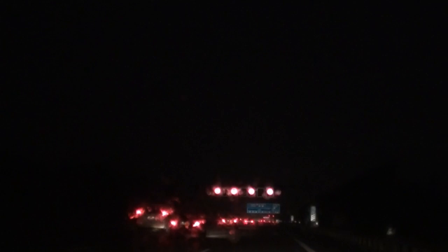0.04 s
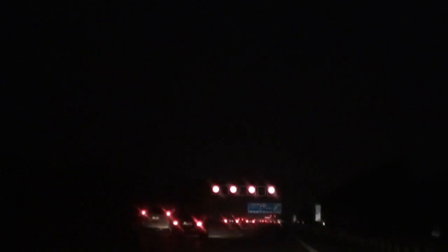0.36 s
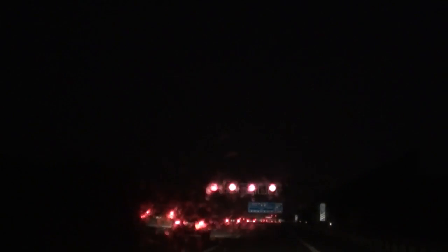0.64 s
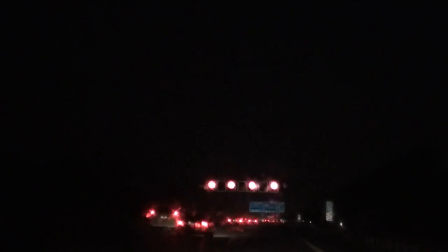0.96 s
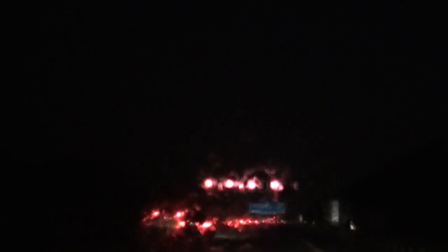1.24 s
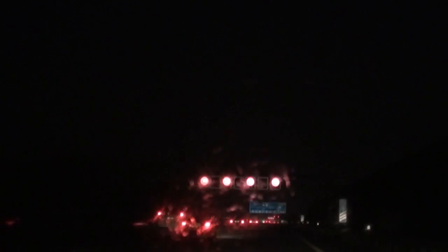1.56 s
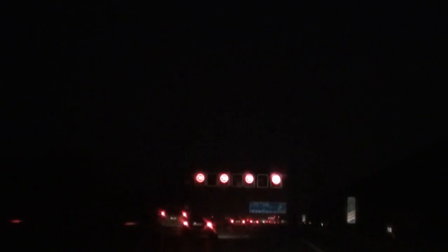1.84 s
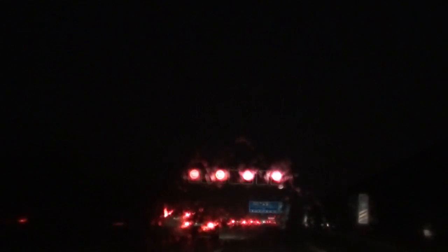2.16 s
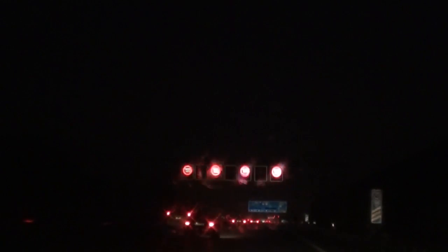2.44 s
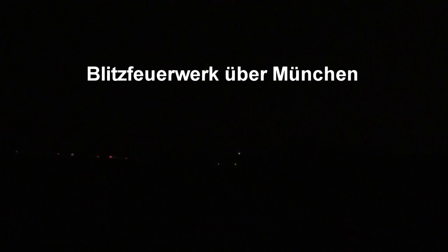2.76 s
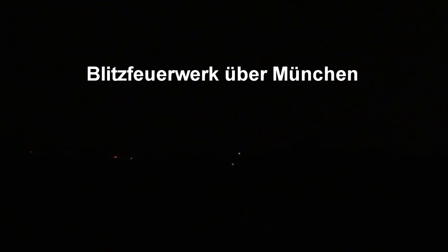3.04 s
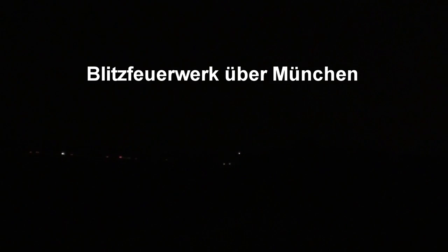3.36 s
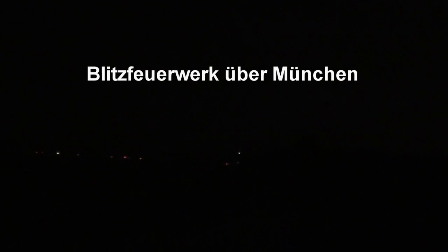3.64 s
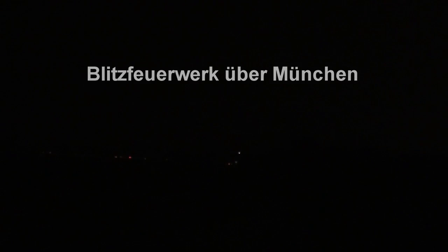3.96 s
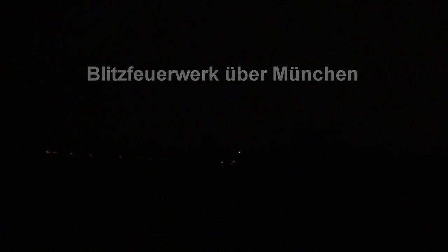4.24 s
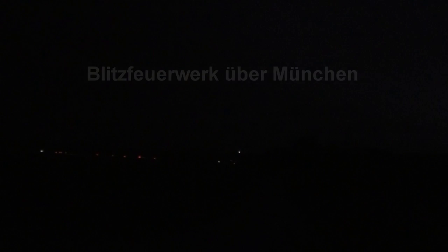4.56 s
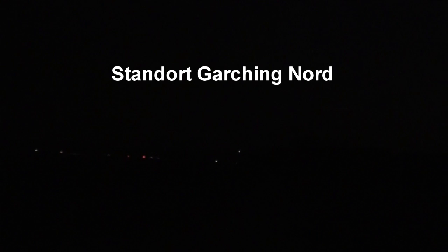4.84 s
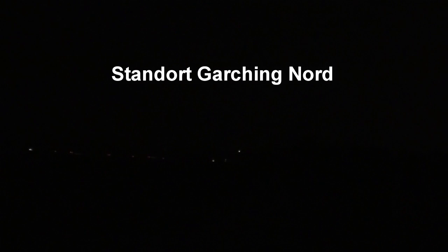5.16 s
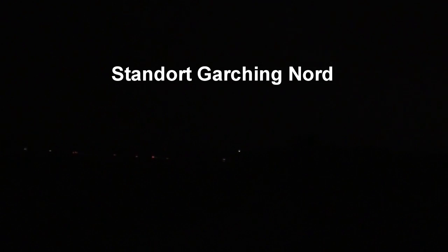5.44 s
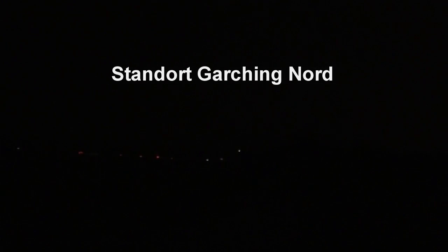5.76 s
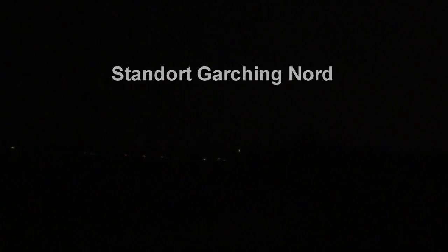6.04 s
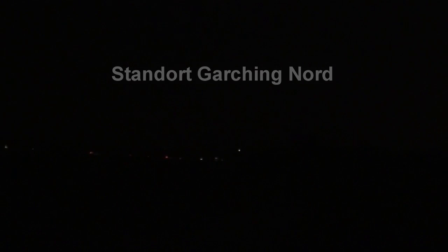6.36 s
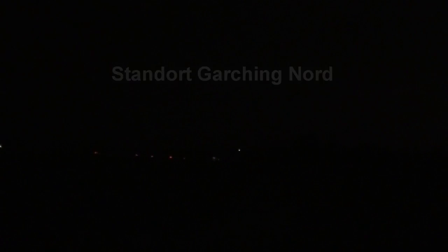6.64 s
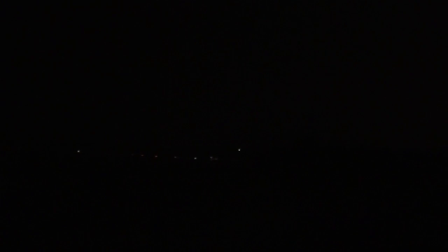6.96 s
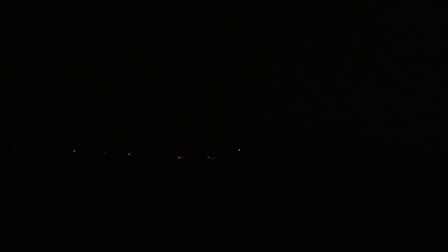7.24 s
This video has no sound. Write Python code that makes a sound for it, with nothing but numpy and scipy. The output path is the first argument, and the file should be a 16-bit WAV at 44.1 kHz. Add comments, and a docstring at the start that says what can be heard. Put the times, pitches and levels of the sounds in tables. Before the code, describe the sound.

A car booms along a wet road, then suddenly gives way to quiet, with a handled camera's clicks, knocks and small whirring motor.

```python
"""Inside a car on a wet motorway at night: the cabin booms, tyres roar and spray patters on the windscreen.
At 2.8 s an abrupt cut leads to the low hum of the standing car, where a hand works a camera.
Its small lens motor creeps, then buttons click, knocks ring the casing and the motor whirs three times.
Faint cricket-like chirps come in around the last whir.
Finally the motor creeps again while palm and fingertip bump and rub the casing."""
import sys
import numpy as np
from scipy import signal
from scipy.fft import rfft, irfft
from scipy.io import wavfile

SR = 44100
rng = np.random.default_rng(int(sys.argv[2]) if len(sys.argv) > 2 else 0)


def store_wav(level_fs):
    """Save 16-bit WAV to argv[1]."""
    pcm = np.round(np.clip(np.atleast_2d(level_fs), -1, 1) * 32767)
    wavfile.write(sys.argv[1], SR, pcm.T.astype(np.int16))


N = 331191
T = np.arange(N) / SR
CUT_S = 2.838

# Cabin boom and tyre roar spectra. Each row: frequency in Hz, density in dB.
BOOM_SPECTRUM = [(20, -30), (30, -19), (38, -11.5), (65, -14), (103, -6), (122, -1.5), (134, 3.5),
                 (147, -4), (162, -12), (178, 0.5), (200, -9), (280, -10.5), (400, -19.5), (700, -53)]
ROAR_SPECTRUM = [(150, -20), (310, 2.5), (410, -4.5), (500, -2), (600, -6.5), (750, -4), (880, -8.5),
                 (1020, -7.5), (1400, -12.5), (2000, -20.5), (3000, -16), (8000, -45)]
# Tread tones. Each row: frequency in Hz, width in Hz, level in dB against the roar.
TREAD_TONES = [(1014, 44, -20), (1725, 15, -23)]
# Rough road. Each row: middle in seconds, length in seconds, extra boom in dB, extra roar in dB.
ROUGH_STRETCHES = [(0.432, 0.3, 2.5, 1), (0.713, 0.14, 5.5, 2), (1.077, 0.39, 2.5, 0), (1.58, 0.36, 1.5, 3),
                   (1.842, 0.28, 1, 3), (2.41, 0.57, 2, 0), (2.76, 0.46, 0.5, 2)]
# Wetter road. Each row: middle in seconds, length in seconds, extra spray in dB.
WET_STRETCHES = [(.14, 0.96, 1.5), (1.286, 0.5, 3), (1.77, 0.55, 1.7)]
# Road balance. Each row: frequency in Hz, left minus right in dB.
ROAD_BALANCE = [(60, 2.2), (150, 2), (380, -0.5), (950, -2), (2380, 0)]
# Road stereo width. Each row: frequency in Hz, side against mid in dB.
ROAD_STEREO_WIDTH = [(30, -17), (60, -13), (100, -12.5), (150, -15), (250, -9.5), (700, -9), (1400, -8.5),
                     (3000, -8.5), (6000, -7), (9000, -9.5), (12000, -52)]

def driving(boom_db=-17, roar_db=-22.5, spray_db=-22, bump_db=0.27, bump_hz=7):
    """Rough road swells the boom and the roar, wet road the spray; the tread sings faintly."""
    boom_db += sum(db * arch(s, length) for s, length, db, _ in ROUGH_STRETCHES)
    roar_db += sum(db * arch(s, length) for s, length, _, db in ROUGH_STRETCHES)
    spray_db += sum(db * arch(s, length) for s, length, db in WET_STRETCHES)
    cabin = amp(boom_db + bump_db * wander(bump_hz)) * noise(BOOM_SPECTRUM, width=ROAD_STEREO_WIDTH)
    tread = sum(amp(db) * unit(wander(width_hz) * np.cos(2 * np.pi * hz * T + wander(width_hz)))
                for hz, width_hz, db in TREAD_TONES)
    tyres = amp(roar_db) * (noise(ROAR_SPECTRUM, width=ROAD_STEREO_WIDTH) + tread)
    return pan_bands(cabin + tyres + amp(spray_db) * spray(), ROAD_BALANCE)


# Spray spectrum before tilting. Each row: frequency in Hz, density in dB.
SPRAY_SPECTRUM = [(1060, -34), (1800, -6.5), (2430, -6), (3320, 1.5), (6070, -3.5), (7220, -2.5),
                  (8210, -5), (11700, -19.5), (13300, -24), (15100, -31), (16000, -29)]

def spray(drops_per_s=1900, spread_db=3.5, tilt_db_per_oct=2, wash_db=-0.5, gust_db=1, gust_hz=22):
    """Fine drops tick on the glass in gusts, over the hiss of tyres on the wet road."""
    sizes = amp(spread_db * np.minimum(rng.exponential(1, N), 5.1))
    lands = rng.random(N) < drops_per_s / SR
    pan = 0.028 * rng.standard_normal(N)
    impacts = sizes * lands * rng.choice([-1, 1], N)
    drop_spectrum = [(hz, db + tilt_db_per_oct * np.log2(hz / 4000)) for hz, db in SPRAY_SPECTRUM]
    ticks = colour_impulses(impacts * np.array([1 + pan, 1 - pan]), drop_spectrum)
    clusters = amp(2.3 * wander(hz=113))
    wash = amp(wash_db) * noise(SPRAY_SPECTRUM, centre_hz=3080, db_per_oct=-1.5, width=ROAD_STEREO_WIDTH)
    gusts = amp(gust_db * wander(gust_hz))
    return unit((unit(ticks * clusters) + wash) * gusts)


# Hand knocks. Each row: start in seconds, level in dB, pitch in Hz, hardness from 0 (flesh) to 1 (nail).
HAND_KNOCKS = [(2.852, -19.5, 122, 0.23), (2.986, -31.5, 745, 0.7), (3.633, -13.5, 118, 0.62),
               (3.692, -10.5, 366, 0.38), (3.739, -11.5, 342, 0.39), (3.796, -21, 338, 0.53),
               (4.792, -13, 388, 0.76), (4.831, -21, 643, 1), (4.895, -25.5, 117, 0.47),
               (5.478, -24, 270, 0.88), (5.521, -13, 363, 0.63), (5.562, -11.5, 595, 0.5),
               (5.581, -12, 287, 0.66), (5.593, -8.5, 101, 0.17), (6.570, -24, 165, 0.34),
               (6.603, -25, 148, .1), (6.674, -16.5, 289, 0.16), (6.725, -10, 144.4, .05),
               (6.76, -14, 150, 0.35), (7.097, -31, 779, .28), (7.436, -15.5, 105, .05),
               (7.452, -20, 220, .05), (7.492, -17.5, 202, .05)]
# Contact types. Each row: hardness, onset softness from 0 to 1, then rattle, clack and tick in dB.
CONTACT_BY_HARDNESS = [(0, 1, -21, -51, -42), (.25, 0.57, -17.5, -41, -29), (.5, .1, -7.5, -26, -24.5),
                       (1, 0, -5.5, -7, -21)]
# Casing modes. Each row: frequency in Hz, level in dB, T60 in seconds.
CASING_RESONANCES = [(133, 0.5, 0.23), (194, 5, 0.14), (244.8, -3, 0.37), (332, -1.5, 0.14),
                     (386, -3, 0.19), (487, 2.5, 0.14), (808, 2.5, 0.09), (1050, -12, 0.043),
                     (1420, -14, 0.073)]
# Casing and loose-part spectra. Each row: frequency in Hz, density in dB.
CASING_SPECTRUM = [(30, -12), (85, 4.5), (140, 2.5), (240, 0.5), (350, 3.5), (550, -6.5), (760, 0.5),
                   (1000, -11.5), (1500, -13.5), (2200, -14.5), (5000, -30)]
CLACK_SPECTRUM = [(400, -16), (800, 5), (1100, 11), (1550, 2.5), (2200, -15), (3200, -3), (6000, -45)]

def casing_knocks(thump_db=-4, modes_db=-5, stiffening=2.94, relax_s=0.0036, size=16384):
    """A blow thumps the casing and rings its modes; harder ones make loose parts rattle, clack and tick."""
    out, t = np.zeros((2, N)), np.arange(size) / SR
    grades, *columns = np.transpose(CONTACT_BY_HARDNESS)
    for start_s, db, hz, hardness in HAND_KNOCKS:
        softness, rattle_db, clack_db, tick_db = (np.interp(hardness, grades, col) for col in columns)
        t60_s = 0.18 * (150 / hz) ** 0.39
        rise_s, db_per_oct = 0.0047 + 0.014 * softness, 4 + 5 * softness  # flesh rounds the blow
        bend = stiffening * (1 - softness) * amp(db) ** 2 * np.exp(-t / relax_s)  # hard blows start high
        phase = 2 * np.pi * np.cumsum(hz * (1 + bend)) / SR
        thump = amp(thump_db) * np.sin(phase) * decay(t, rise_s, 0.56 * t60_s)
        ringing = amp(modes_db) * modes(CASING_RESONANCES, t, hz, db_per_oct + 4, rise_s, detune=0.0386)
        rattle = amp(rattle_db) * noise(CASING_SPECTRUM, size, hz, db_per_oct)
        rattle *= decay(t, 0.72 * rise_s, 1.15 * t60_s)
        clack = amp(clack_db) * noise(CLACK_SPECTRUM, size) * decay(t, rise_s=0.0016, t60_s=0.15)
        tick = amp(tick_db) * noise(SNAP_SPECTRUM, size, centre_hz=4000, db_per_oct=3)
        tick *= decay(t, rise_s=0.00048, t60_s=0.38)
        add(out, start_s, amp(db) * (thump + ringing + rattle + clack + tick))
    return out


# Button and gear-tooth clicks. Each row: start in seconds, level in dB, centre in Hz.
PLASTIC_CLICKS = [(3.467, -20, 4030), (3.4971, -14, 3540), (3.616, -30.5, 1080), (3.640, -23.5, 6000),
                  (4.028, -26, 1200), (4.4721, -30.5, 1130), (4.623, -29.5, 2380), (4.735, -19.5, 7150),
                  (4.767, -30, 1500), (5.319, -26, 1700), (5.3479, -16, 4250), (5.4654, -29.5, 1700),
                  (5.523, -24, 5600), (5.7653, -30, 1350), (5.923, -33.5, 1035), (6.123, -41.5, 1300),
                  (6.96, -30.5, 4930), (7.255, -41, 2190)]
# Button modes. Each row: frequency in Hz, level in dB, T60 in seconds.
BUTTON_MODES = [(1530, -1, 0.089), (2420, -5, 0.084), (2720, -16, 0.057), (3374, 1, 0.04), (3830, 1, 0.035),
                (5020, 0, 0.044), (6930, -3, 0.071), (7000, -22, 0.033), (8860, -5, 0.028)]
# Plastic snap spectrum. Each row: frequency in Hz, density in dB.
SNAP_SPECTRUM = [(300, 26), (800, 8), (1900, 2), (2900, -2), (3600, -0.5), (5500, -6.5), (7000, -4),
                 (9500, -8.5), (15000, -31)]

def plastic_clicks(modes_db=-5, snap_db=-8.5, reference_hz=1100, size=8192):
    """Plastic parts snap and ring; smaller, brighter ones snap more briefly and shake the casing less."""
    out, t = np.zeros((2, N)), np.arange(size) / SR
    for start_s, db, hz in PLASTIC_CLICKS:
        t60_s = 0.092 * (reference_hz / hz) ** 0.29
        body_db = -0.5 - 5.5 * np.log2(hz / reference_hz)
        ringing = modes(BUTTON_MODES, t, hz, db_per_oct=4, rise_s=0.0011, detune=0.032)
        snap = noise(SNAP_SPECTRUM, size, hz, db_per_oct=7.5) * decay(t, rise_s=0.00065, t60_s=t60_s)
        body = noise(CASING_SPECTRUM, size, centre_hz=820, db_per_oct=2.5)
        body *= decay(t, rise_s=0.0052, t60_s=0.067)
        add(out, start_s, amp(db) * (amp(modes_db) * ringing + amp(snap_db) * snap + amp(body_db) * body))
    return out


# Motor runs, the faint ones creeping. Each row: start in seconds, stop in seconds, level in dB.
MOTOR_RUNS = [(2.852, 3.364, -55.5), (3.749, 3.795, -36.5), (3.813, 4.499, -38), (4.842, 4.895, -43),
              (4.934, 5.11, -61.5), (5.563, 5.945, -40.5), (6.467, 6.53, -62), (6.602, 7.35, -67)]
# Shaft speed, sagging under load. Each row: time in seconds, speed in Hz.
SHAFT_SPEED = [(3.75, 88.1), (4.05, 88.94), (4.25, 88.3), (4.47, 87.6), (5.6, 88.6), (5.95, 88.8)]
# Motor whine. Each row: multiple of the shaft speed, level in dB.
SHAFT_ORDERS = [(1, 3), (4, -1), (5, -8), (8, 1.5), (9, -9), (10, -2.5), (11, -15), (12, -4.5), (13, -11),
                (14, -9), (16, -2.5), (19, -18), (20, -9), (24, -12), (32, -14), (58, -10), (77, -16),
                (79, -15)]
# Gear rasp spectrum. Each row: frequency in Hz, density in dB.
GEAR_SPECTRUM = [(180, -8), (340, -10), (560, -11.5), (760, -7), (1100, -21), (1450, -18), (2400, -21),
                 (3400, -14.5), (4600, -9), (5800, -10.5), (7050, -5.5), (8000, -12), (10500, -23.5),
                 (16000, -52)]

def lens_motor(whine_db=-1.2, gears_db=2, hiss_db=-9.5, hum_db=-6,
               surge_db=4, settle_s=0.091, ease_db_per_s=-3):
    """The shaft whines, the gears rasp and throb with the motor's poles, the sliding lens hisses and hums."""
    shaft_hz = np.interp(T, *np.transpose(SHAFT_SPEED)) * (1 + 0.0015 * wander(hz=11.7))
    turns = np.cumsum(shaft_hz) / SR
    whine = sum(amp(db + wander(hz=19)) * np.cos(2 * np.pi * (order * turns + rng.random()))
                for order, db in SHAFT_ORDERS)
    pole_throb = 1 + 0.21 * np.cos(2 * np.pi * 4 * turns)
    rasp = amp(gears_db) * noise(GEAR_SPECTRUM) * pole_throb
    slide = amp(hiss_db) * noise(HISS_SPECTRUM) + amp(hum_db) * noise(HUM_SPECTRUM)
    envelope = np.zeros(N)
    for start_s, stop_s, db in MOTOR_RUNS:
        age_s = np.maximum(T - start_s, 0)
        run_db = db + surge_db * np.exp(-age_s / settle_s) + ease_db_per_s * age_s
        envelope += amp(run_db) * gate(start_s, stop_s, attack_s=0.015, release_s=0.052)
    return envelope * (rasp + slide + amp(whine_db) * unit(whine))


# Rubs on the casing. Each row: start in seconds, length in seconds, level in dB.
PALM_RUBS = [(3.396, 0.19, -41.5), (6.508, 0.093, -39.5), (6.664, .15, -20), (6.79, 0.15, -37),
             (7.47, 0.14, -33)]
TIP_SCRAPES = [(7.095, 0.38, -43.5), (7.186, 0.091, -43)]
# Palm and fingertip friction spectra. Each row: frequency in Hz, density in dB.
PALM_SPECTRUM = [(60, -36), (110, -11), (145, 8), (180, -4), (220, 2), (260, -12), (310, -2), (410, -25),
                 (510, -9), (700, -46), (1200, -34), (3000, -58)]
TIP_SPECTRUM = [(120, -3), (270, -6), (350, 0.5), (520, -7), (680, -4), (820, -4.5), (1020, -20),
                (2000, -42), (5000, -50)]

def hand_rubs(slip_db=2, slip_hz=45, palm_skin_db=-23, tip_skin_db=-16, skin_lag_s=0.024):
    """The palm drags dully and a fingertip scrapes, sticking and slipping; skin hisses once it slides."""
    palm = sum(amp(db) * arch(s + length / 2, length) ** 0.5 for s, length, db in PALM_RUBS)
    tip = sum(amp(db) * gate(s, s + length, attack_s=0.012, release_s=0.072)
              for s, length, db in TIP_SCRAPES)
    skin = amp(palm_skin_db) * np.interp(T - skin_lag_s, T, palm) + amp(tip_skin_db) * tip
    friction = palm * noise(PALM_SPECTRUM) + tip * noise(TIP_SPECTRUM)
    hiss = skin * noise(SNAP_SPECTRUM, centre_hz=2300, db_per_oct=4)
    return (friction + hiss) * amp(slip_db * wander(slip_hz))


# Hum and hiss spectra, also used for the sliding lens. Each row: frequency in Hz, density in dB.
HUM_SPECTRUM = [(20, -40), (50, 6.5), (75, -2.5), (125, 2), (190, 3.5), (250, -6), (450, -16), (900, -28.5),
                (1600, -49), (4000, -31)]
HISS_SPECTRUM = [(500, 8), (950, 11.5), (2000, 5), (3400, 2.5), (5500, -0.5), (7200, 2.5), (9500, -3.5),
                 (16000, -12.5)]

def distant_traffic(hum_db=-42.5, ebb_db_per_s=-0.78, drift_db=1, drift_hz=3, hiss_db=-54):
    """Far traffic hums in the standing car, drifting and ebbing over a steady faint hiss."""
    hum_db += ebb_db_per_s * (T - CUT_S) + drift_db * wander(drift_hz)
    return amp(hum_db) * noise(HUM_SPECTRUM) + amp(hiss_db) * noise(HISS_SPECTRUM)


# Chirps. Each entry: start in seconds.
CHIRP_STARTS_S = [5.41, 5.92, 5.995, 6.045, 6.125, 6.17]

def cricket(level_db=-57, hz=9900, length_s=0.026):
    """Short narrow-band rasps, like a bush cricket far off in the verge."""
    out, size = np.zeros((2, N)), round(length_s * SR)
    for start_s in CHIRP_STARTS_S:
        add(out, start_s, amp(level_db) * noise(HISS_SPECTRUM, size, hz, db_per_oct=70) * np.hanning(size))
    return out


# Stereo width of close sounds. Each row: frequency in Hz, side against mid in dB.
NEAR_STEREO_WIDTH = [(60, -45), (130, -42), (200, -29), (350, -14), (700, -9), (1400, -6.5), (3000, -8.5),
                     (6000, -10.5), (9500, -11), (12000, -35)]

def noise(spectrum, size=N, centre_hz=1000, db_per_oct=0, width=NEAR_STEREO_WIDTH):
    """Coloured stereo noise of rms 1, cut by db_per_oct on both sides of the centre."""
    hz = np.fft.rfftfreq(size, 1 / SR)
    mid, side = rfft(rng.standard_normal((2, size)))
    side *= amp(curve_at(width, hz))
    colour = amp(curve_at(spectrum, hz) - db_per_oct * abs(np.log2((hz + 1) / centre_hz)))
    return unit(irfft(np.array([mid + side, mid - side]) * colour, size))


def modes(table, t, centre_hz, db_per_oct, rise_s, detune):
    """Dying modes, peak 1; those near the blow's centre frequency ring most, and the grip detunes them."""
    x = sum(amp(db - db_per_oct * abs(np.log2(hz / centre_hz))) * decay(t, rise_s, t60_s)
            * np.sin(2 * np.pi * hz * (1 + detune * rng.standard_normal()) * t) for hz, db, t60_s in table)
    return x / abs(x).max()


def colour_impulses(x, spectrum, size=4096, taps=512):
    """Minimum-phase filter with the given spectrum."""
    log_gain = np.log(amp(curve_at(spectrum, abs(np.fft.fftfreq(size, 1 / SR)))))
    response = np.fft.ifft(np.exp(np.conj(signal.hilbert(log_gain)))).real[:taps]
    return signal.oaconvolve(x, response[None], axes=1)[:, :N]


def pan_bands(x, balance):
    """Leans each band left or right."""
    half_db = curve_at(balance, np.fft.rfftfreq(N, 1 / SR)) / 2
    return irfft(rfft(x) * amp([half_db, -half_db]), N)


def wander(hz):
    """Random drift of rms 1, up to the given rate."""
    f = np.fft.rfftfreq(N, 1 / SR)
    return unit(irfft(rfft(rng.standard_normal(N)) / (1 + (f / hz) ** 4), N))


def decay(t, rise_s, t60_s):
    """Quick swell and exponential decay, peak 1."""
    shape = (1 - np.exp(-t / rise_s)) * np.exp(-np.log(1000) * t / t60_s)
    return shape / shape.max()


def arch(middle_s, length_s):
    """Smooth rise and fall, peak 1."""
    return np.cos(np.pi * np.clip((T - middle_s) / length_s, -0.5, 0.5)) ** 2


def gate(start_s, stop_s, attack_s, release_s):
    """Linear attack, hold at 1, linear release."""
    return np.clip(np.minimum((T - start_s) / attack_s, (stop_s - T) / release_s) + 0.5, 0, 1)


def curve_at(points, hz):
    """Interpolates on a log-frequency axis."""
    f, value = np.transpose(points)
    return np.interp(np.log(hz + 1), np.log(f + 1), value)


def amp(db):
    """Decibels to gain."""
    return 10 ** (np.asarray(db) / 20)


def unit(x):
    """Scales to rms 1."""
    return x / np.sqrt(np.mean(x ** 2) + 1e-20)


def add(mix, start_s, sound):
    """Mixes a sound in at start_s."""
    part = mix[:, round(start_s * SR):][:, :sound.shape[-1]]
    part += sound[..., :part.shape[1]]


# Camera balance. Each row: frequency in Hz, left minus right in dB.
CAMERA_BALANCE = [(150, 0.5), (400, -1.5), (750, -2), (2000, -1.5), (7500, -2), (12000, 0)]

def scene(crossfade_s=0.0097):
    """The drive, then the camera being handled in the standing car."""
    after_cut = np.clip((T - CUT_S) / crossfade_s + 0.5, 0, 1)
    camera = pan_bands(lens_motor() + plastic_clicks() + casing_knocks() + hand_rubs(), CAMERA_BALANCE)
    return (1 - after_cut) * driving() + after_cut * (distant_traffic() + cricket() + camera)


def record(dry):
    """Rounds the highest peaks, then limits the band."""
    ceiling, cutoff_hz = 0.82, 15850
    rounded = dry / (1 + (dry / ceiling) ** 6) ** (1 / 6)
    lowpass = signal.firwin(511, cutoff_hz, window=("kaiser", 9), fs=SR)
    return signal.oaconvolve(rounded, lowpass[None], "same")


dry = scene()
out = record(dry)
store_wav(out)
```